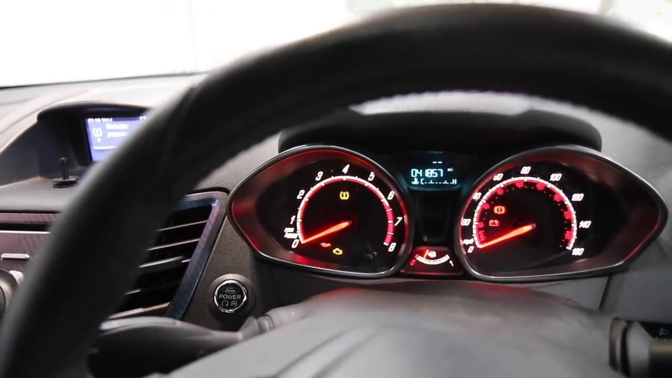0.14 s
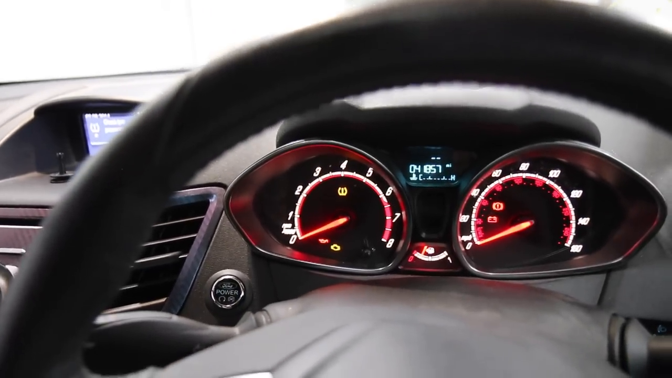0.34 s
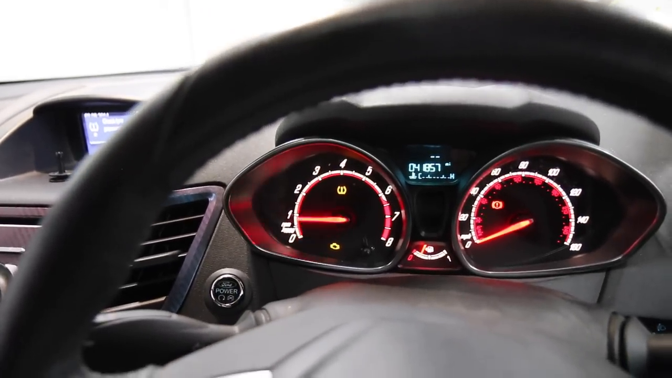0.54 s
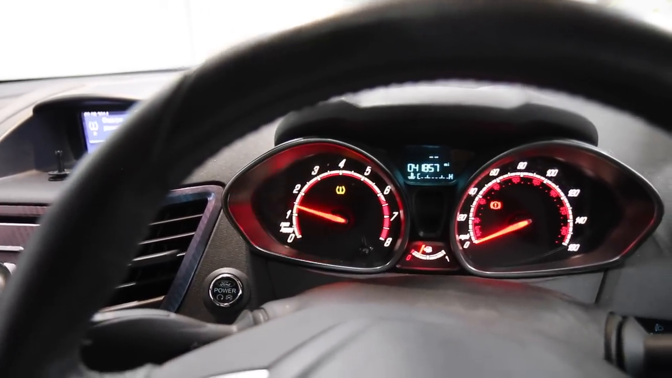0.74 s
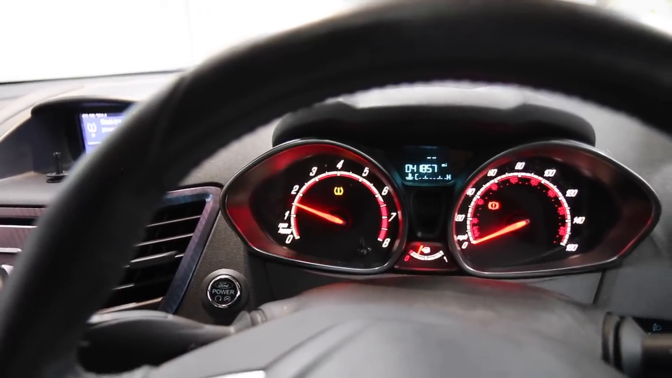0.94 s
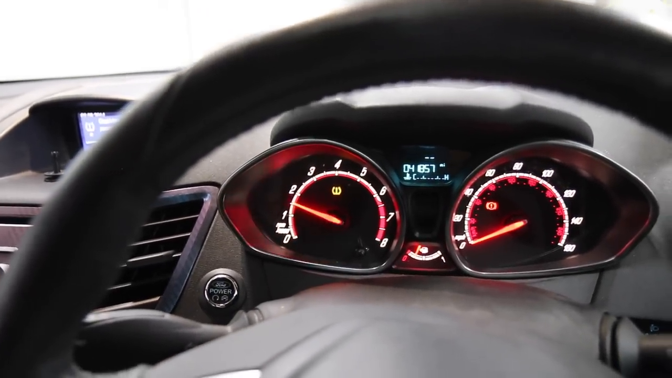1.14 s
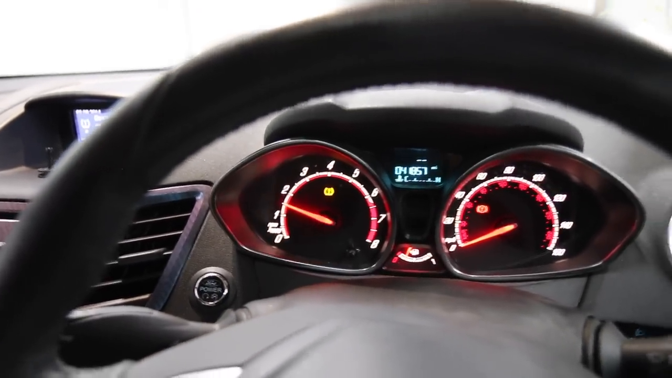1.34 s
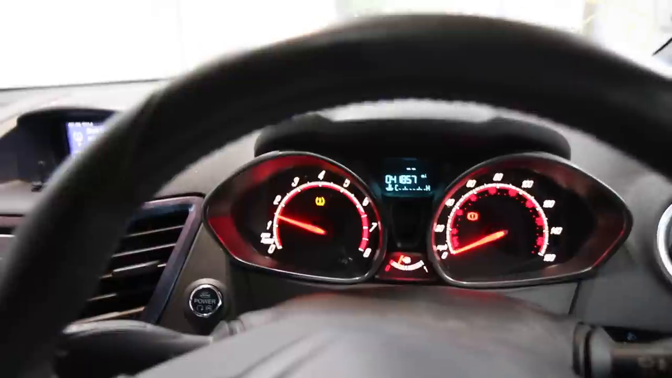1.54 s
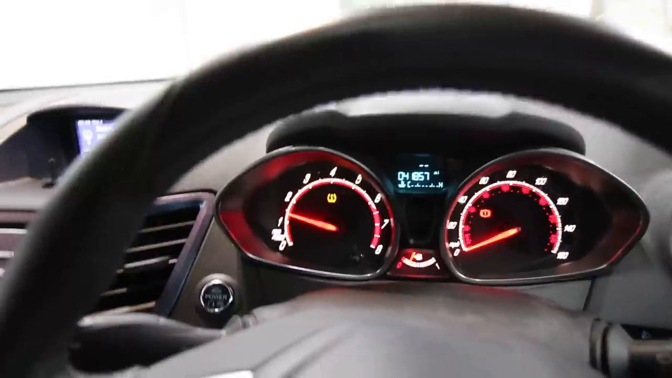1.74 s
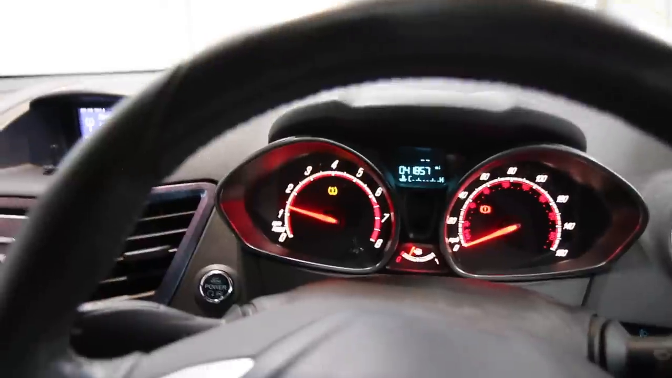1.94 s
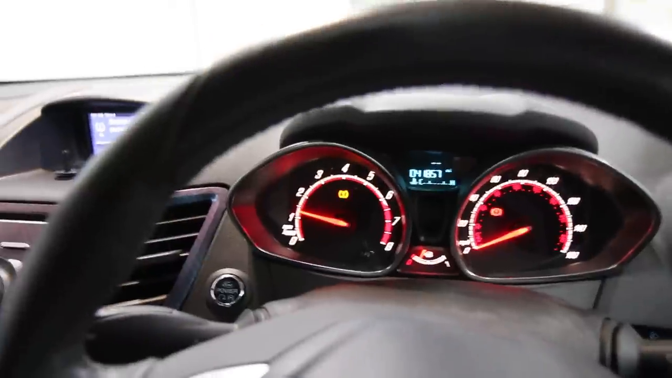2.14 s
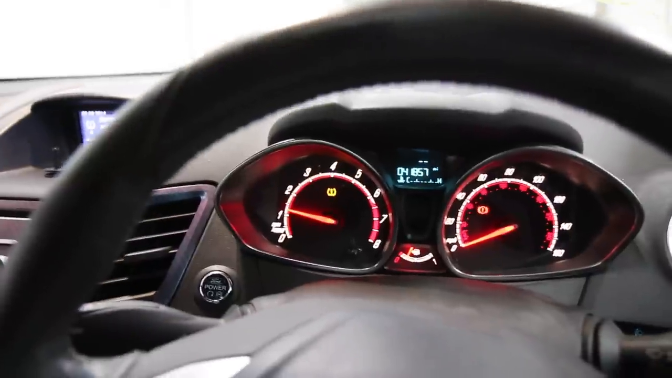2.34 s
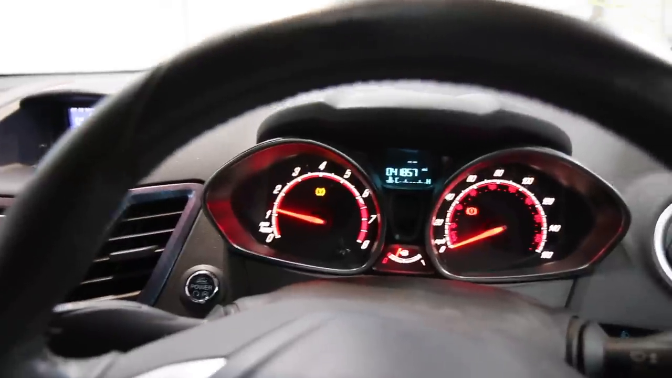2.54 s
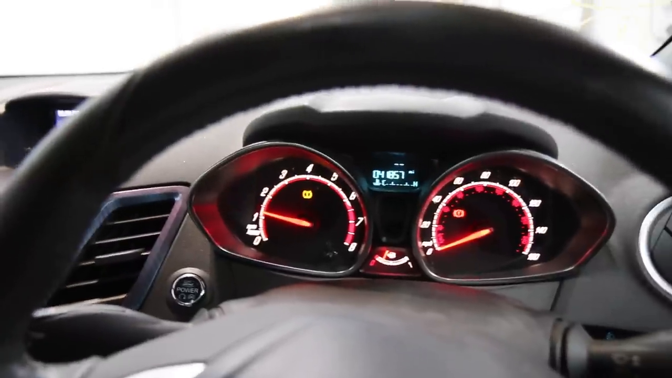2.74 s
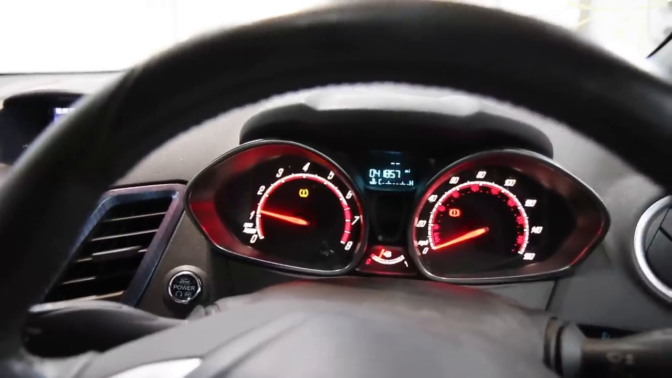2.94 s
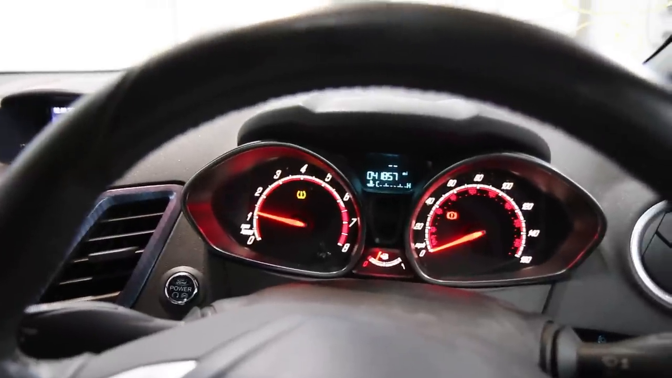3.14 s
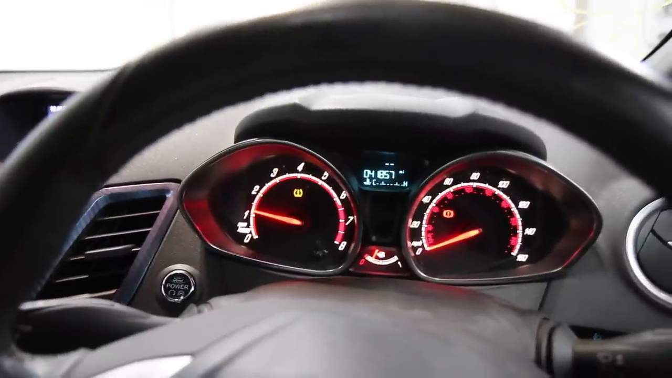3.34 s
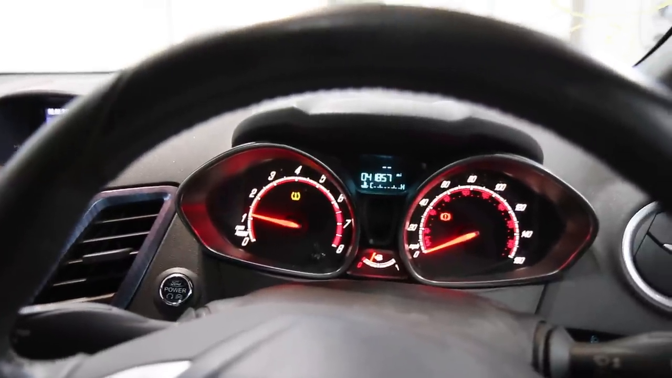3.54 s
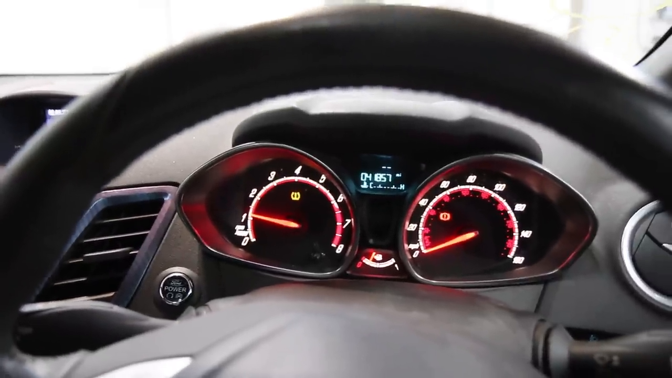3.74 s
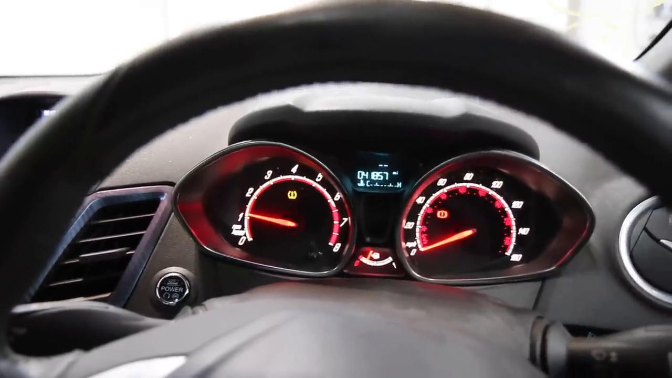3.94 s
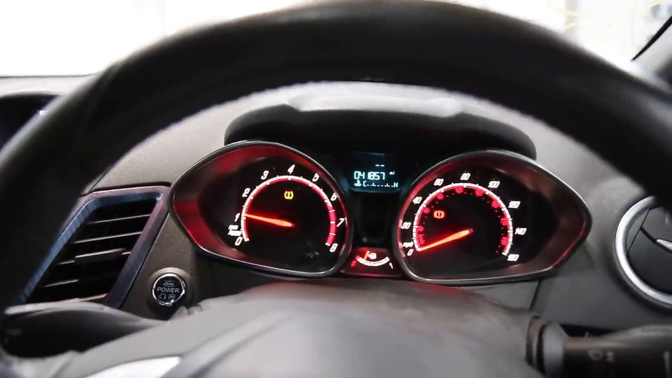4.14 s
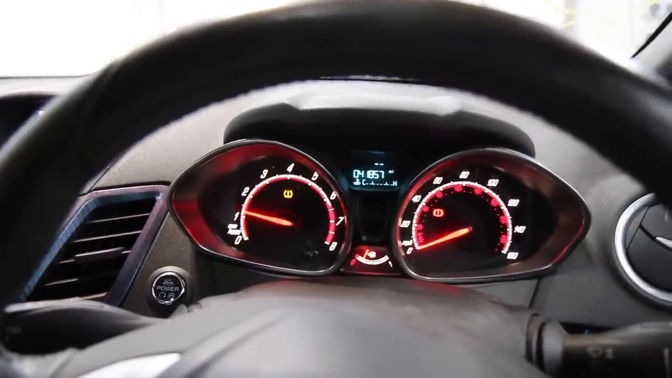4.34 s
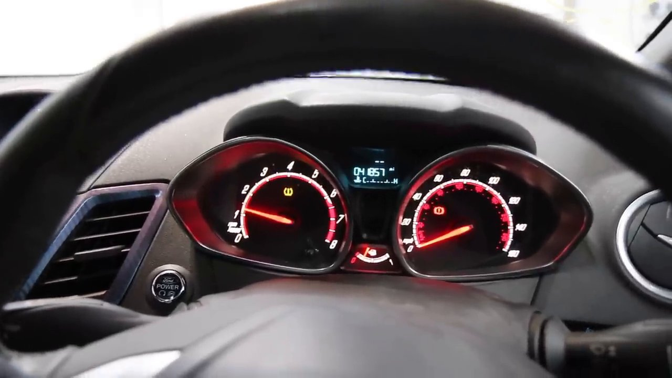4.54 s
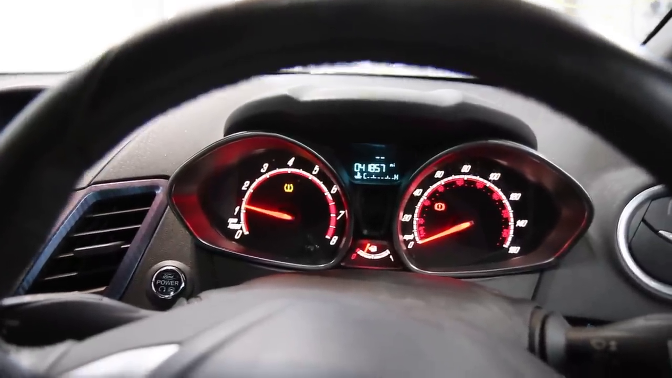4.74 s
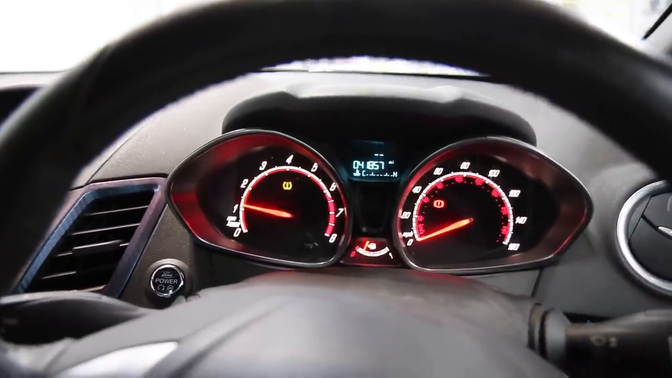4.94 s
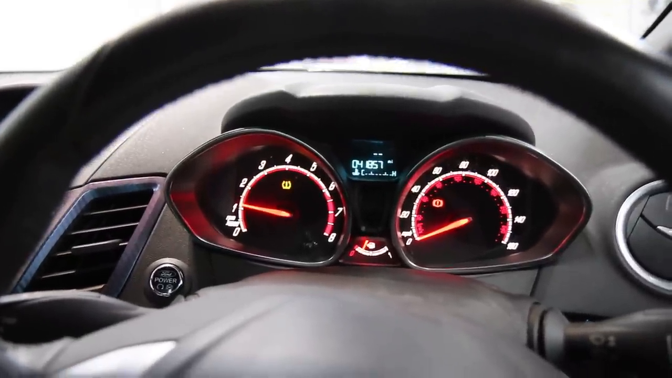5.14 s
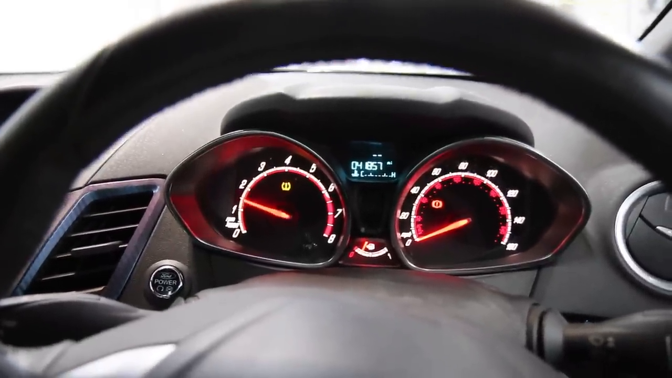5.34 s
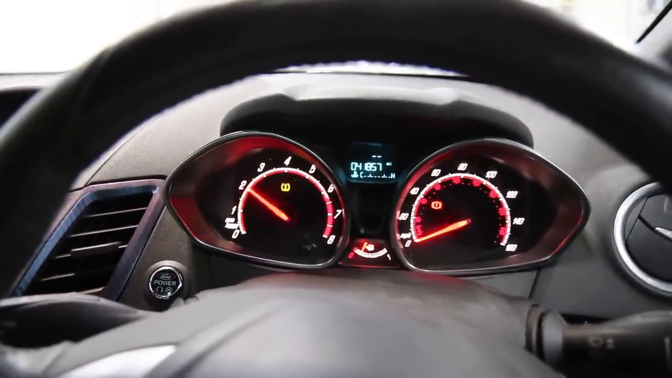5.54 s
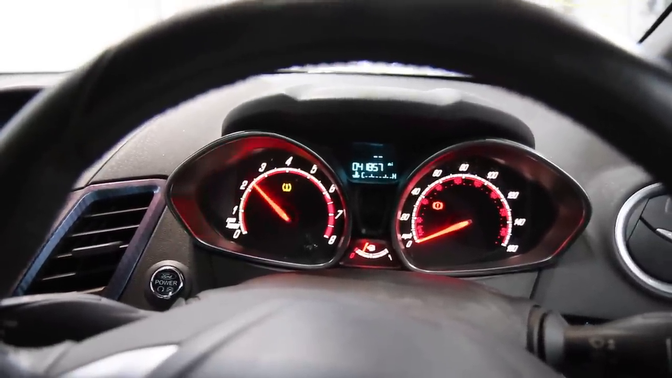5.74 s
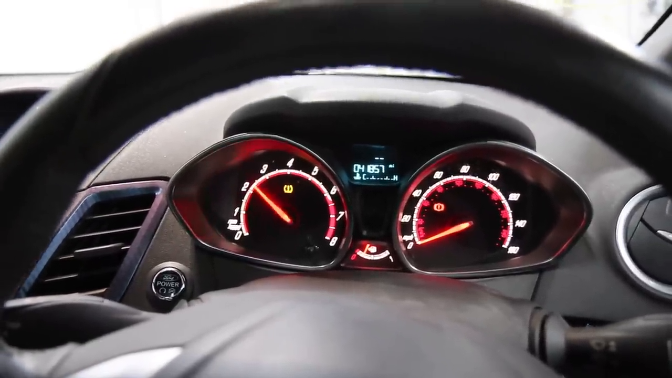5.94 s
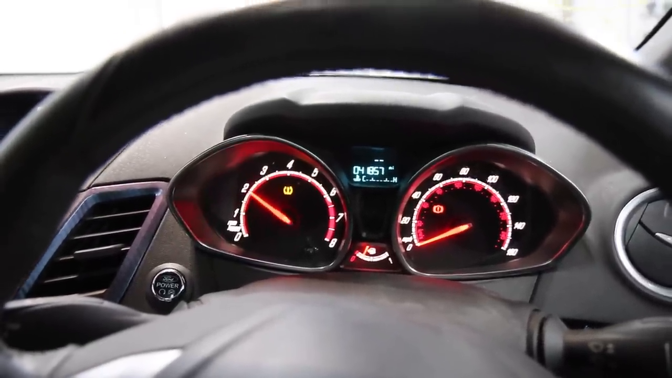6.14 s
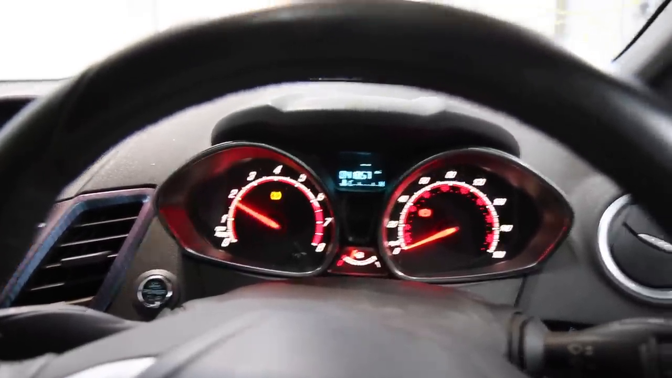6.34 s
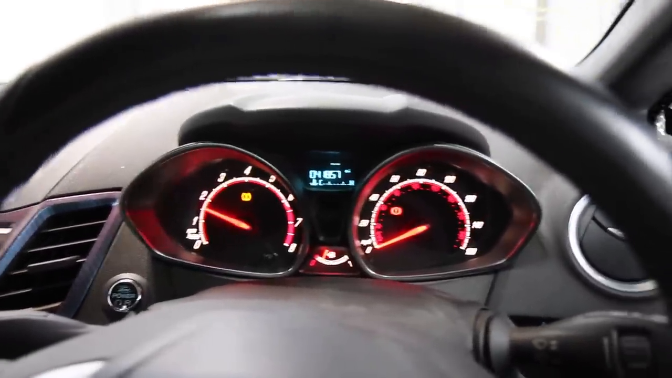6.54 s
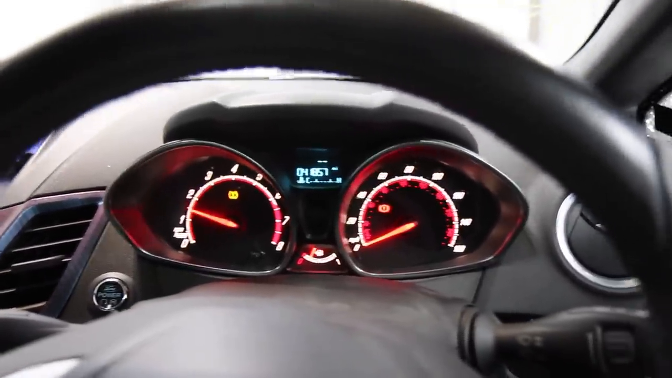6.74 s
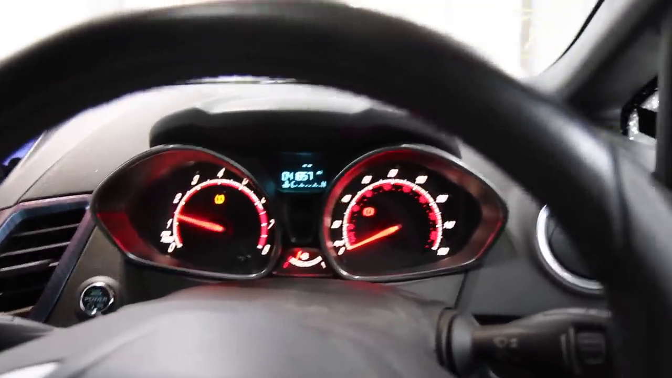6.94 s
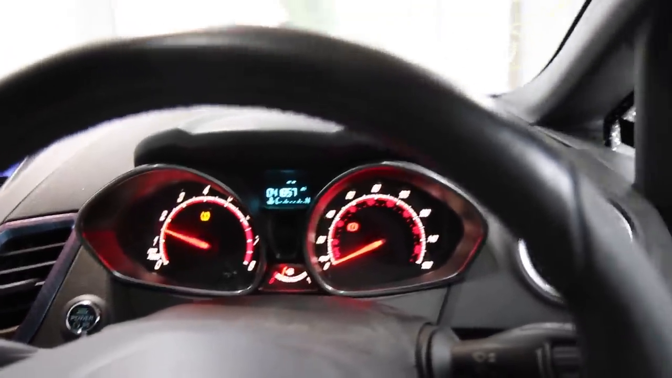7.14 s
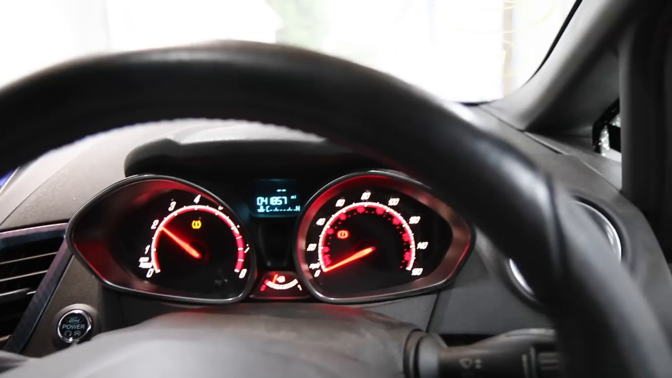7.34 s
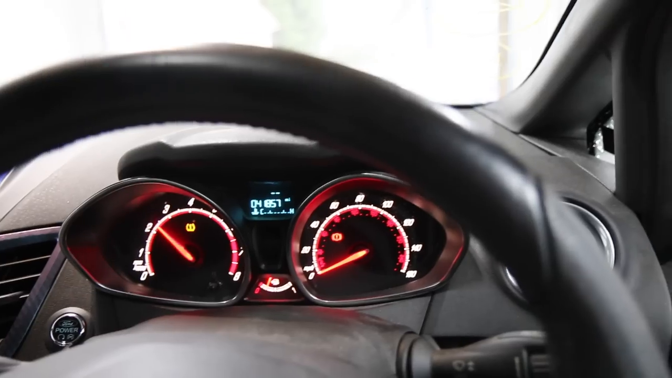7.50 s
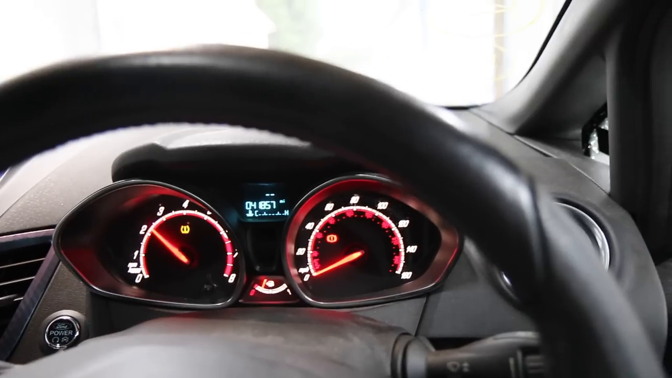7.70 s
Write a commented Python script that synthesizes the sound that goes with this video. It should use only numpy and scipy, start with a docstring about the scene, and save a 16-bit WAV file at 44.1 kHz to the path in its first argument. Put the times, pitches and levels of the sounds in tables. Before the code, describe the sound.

Heard from the driver's seat of a closed car, the engine starts almost at once with a short whirr, a chirp and a few low thumps. The revs rise and sink to a deep, droning idle, with small plastic knocks and faint rustling close by. The throttle is then tapped lightly once and harder twice, the engine growling up and falling back, before a last rev begins.

```python
"""A starter whirrs and a belt chirps as a four-cylinder car engine catches with a shudder, heard from the
driver's seat. It flares, settles to idle, then gets one light and two strong blips of the throttle; a
fourth begins at the end. Periodic firing forces the cabin's air modes into a boom, higher harmonics
drone through the body, and puffs of noise add roughness. The closed cabin lets little treble in.
Close by, plastic trim knocks, ticks and creaks, and a hand rustles over a faint hiss."""
import sys
import numpy as np
from scipy import signal
from scipy.fft import rfft, irfft, next_fast_len
from scipy.io import wavfile
from scipy.ndimage import uniform_filter1d, minimum_filter1d, map_coordinates

SR = 44100
rng = np.random.default_rng(int(sys.argv[2]) if len(sys.argv) > 2 else 0)


def pcm_store(signal):
    """Save signal as 16-bit PCM."""
    levels = np.round(np.clip(np.atleast_2d(signal), -1, 1) * 32767)
    wavfile.write(sys.argv[1], SR, levels.astype(np.int16).T)


N = 342591
TIME = np.arange(N) / SR

# engine speed with the pedal up (cranking, flare, idle): time_s, firing_hz
IDLE_SPEED = [(0, 20), (.2, 22), (.55, 46.4), (.76, 53.7), (1.35, 47.9), (1.95, 42.3), (2.3, 40.8),
              (3, 39.7), (3.8, 37.75), (4.15, 38), (4.6, 40.7), (4.85, 38.3), (5.13, 37.1), (6.6, 47.4),
              (7, 42.9)]
# throttle blips: start_s, rise_s, hold_s, top_firing_hz
BLIPS = [(4.16, .21, .07, 44.7), (5.14, .45, .06, 82.2), (6.99, .36, .07, 81.3), (7.67, .12, .05, 78)]
# how hard the cylinders fire relative to idle, negative while coasting: time_s, load_db
LOAD = [(0, 6), (.1, -3.5), (.24, 16), (.5, 16), (.7, 0.5), (1, -1.5), (1.4, 0), (1.7, -1.5), (2.4, 0.5),
        (3.7, -2.5), (4.15, 0.5), (4.36, 6.5), (4.6, 1), (4.95, -1), (5.22, 9), (5.45, 5), (5.65, 5),
        (5.92, 0), (6.25, -4), (6.55, -9), (6.8, -3), (7.05, 7), (7.35, 2.5), (7.58, -1), (7.77, 2.5)]
# low orders, with quarters from unequal cylinders: firing_multiple, level_db, db_per_load_db
LOW_ORDERS = [(0.748, -14, -1.4), (1.002, 3.5, 0.57), (1.25, -26, -0.5), (1.499, -29, 0.3),
              (2.001, -5, 1.12), (2.502, -24, -0.5), (2.999, -11.5, 1.19)]
# high orders, with halves from unequal cylinders: firing_multiple, level_db
HIGH_ORDERS = [(3.5, 3.5), (4.0, 14), (4.5, -4.5), (5.0, 10.5), (5.5, 1.5), (6.0, 6.5), (6.5, -4),
               (7.0, 6.5), (7.5, 0), (8.0, 3), (8.5, 4), (9.0, 0.5), (9.5, 0.5), (10.0, 1.5), (10.5, -7.5),
               (11.0, -3.5), (11.5, -5.5), (12.0, -11), (12.5, -17.5), (13.0, -5.5)]
# transmission from engine to seat: frequency_hz, gain_db
BODY_RESPONSE = [(130.0, 0), (165.0, -15.5), (195.0, -3), (220.0, -4), (248.0, 6), (285.0, -17),
                 (325.0, -1.54), (360.0, -5.5), (385.0, 1.5), (415.0, -4.5), (447.0, 11.5), (468.0, -2.5),
                 (495.0, -1.5), (560.0, -20), (680.0, -7), (800.0, -12.5), (1000.0, -50.5)]
# cabin resonances, and the belt's for the chirp: centre_hz, width_hz, gain_db
AIR_MODES = [(40.9, 6, -26.5), (59.8, 3.26, -5), (67.4, 4.6, -7.5), (72.8, 3.6, -14.5), (96.8, 4.7, -23.5),
             (131.8, 5.63, -9), (190, 21, -13.5), (197, 12, -18.5), (241, 25, -11.5)]
GROWL_MODES = [(132.3, 24, 4.5), (193, 16, 3.5), (233, 22, -5.5)]
RASP_MODES = [(334, 31, -2.5), (392.4, 9.1, -3.5), (455.3, 22, -3.5), (465, 30, -11)]
CHIRP_MODES = [(2110, 90, -6), (2188, 55, 0), (2240, 70, -4), (2370, 140, -11)]
# growth of the engine layers: idle_db, db_per_load_db, db_per_speed_octave
DRONE_LAW, GROWL_LAW = (-44.5, 1.0, 1), (-41.5, 1.05, 17)
RASP_LAW, RUSH_LAW = (-40, 0.74, 10.5), (-52, 0.26, 6.54)
# the starter engages, then cranks: start_s, length_s, level_db
STARTER_RUNS = [(0, 0.048, -42.5), (0.123, 0.292, -44)]
# jolts of the first firings: start_s, pitch_hz, level_db, t60_s
JOLTS = [(0.165, 195, -9, 0.052), (.225, 60, -10, .15), (0.251, 188, -13.5, .1), (.271, 48, 0, 0.25),
         (0.306, 108, -5.5, 0.16), (0.365, 60, -3, 0.38), (.398, 61, 5.5, .17), (0.398, 120, -10.5, .1),
         (0.474, 66, 4, 0.26), (0.513, 128, -0.5, 0.12)]
# knocks on the trim, levels relative: start_s, click_db, clack_db, thud_db, clack_t60_s
KNOCKS = [(0.355, -39.5, -34.5, -34, 0.12), (2.1, -39.5, -32.5, -7, 0.089), (2.264, -28, -25, -16, 0.024),
          (2.274, -29, -28, -12, 0.06), (2.63, -50.5, -33.5, -26, 0.054), (2.974, -68, -43.5, -43, 0.16),
          (3.009, -39.5, -39.5, -29, 0.061), (3.05, -52, -39, -23.5, 0.064),
          (3.076, -53.5, -36.5, -35.5, .05), (3.121, -72, -46.5, -29, 0.12)]
# ticks of the trim: start_s, relative_level_db
TICKS = [(0.5122, -34.5), (.6439, -40), (1.7524, -30), (2.005, -42), (2.8439, -37), (2.871, -40),
         (2.8924, -39.5), (3.72, -40)]
# swells of the belt, a panel and a moving hand: centre_s, length_s, level_db
BELT_CHIRPS = [(.26, 0.088, -39.5), (.6, 0.32, -59), (1.8, 0.4, -65), (3.35, 0.37, -61.5),
               (3.95, 0.14, -64), (6.62, 0.47, -63)]
CREAKS = [(2.99, .05, -46), (3.06, .06, -44)]
RUSTLES = [(1.36, 0.28, -59.5), (1.62, 0.14, -62.5), (1.9, 0.29, -62), (2.07, 0.13, -58.5),
           (2.62, .49, -59), (3.03, .13, -59)]
# spectra of the noise sources: frequency_hz, relative_density_db
SHAKE_SPECTRUM = [(22, -6), (45, -7), (65, -9.5), (90, 9.5), (150, -11), (200, -11.5)]
RUSH_SPECTRUM = [(300, -38.5), (520, -15), (670, 1), (880, -4.5), (1150, -11.5), (1650, -22), (2000, -22),
                 (3000, -27.5), (5000, -27), (9000, -54.5)]
WHIRR_SPECTRUM = [(500, -1.5), (800, 17), (1150, 12), (1550, 11), (1850, 0.5), (3000, -0.5), (4000, -3),
                  (6000, -4.5), (7000, -8.5), (10000, -17), (15800, -26)]
CLICK_SPECTRUM = [(900, -30), (2500, 1), (3500, 0), (6000, -1), (9000, -9), (12500, -14), (15800, -24)]
CLACK_SPECTRUM = [(300, -7), (600, -12.5), (850, -1), (925, 1.5), (1050, -5), (1400, -8.5), (1700, -6.5),
                  (2000, -17), (3500, -25.5)]
THUD_SPECTRUM = [(60, -24.5), (130, -1.5), (180, 9), (240, -6.5), (295, -1), (370, -14), (480, -15),
                 (700, -21.5)]
TICK_SPECTRUM = [(1500, -15), (3300, -5), (5000, 2), (8000, -11), (11000, -22), (15800, -30.5)]
RUSTLE_SPECTRUM = [(1000, -8), (3000, 0.5), (5000, -0.5), (8000, -3.5), (11000, -15.5), (15800, -21.5)]
HISS_SPECTRUM = [(500, 5.5), (900, 13), (1150, 16.5), (1600, 13.5), (1950, 8.5), (2300, 8), (3000, 5.5),
                 (5000, 3), (7000, 2), (10000, 0), (15800, -1)]


def engine_speed(coast_per_s=.575):
    """Firing rate in Hz: each blip raises it, then friction decays it exponentially to governed idle."""
    idle = speed = curve(IDLE_SPEED)
    for start, rise, hold, top in BLIPS:
        before = np.interp(start, TIME, speed)
        climb = before + (top - before) * ease((TIME - start) / rise)
        coasting_s = np.maximum(TIME - start - rise - hold, 0)
        coast = np.maximum(idle, top * np.exp(-coast_per_s * coasting_s))
        speed = np.select([TIME < start, TIME < start + rise], [speed, climb], coast)
    return speed * (1 + .003 * wobble(9))


def engine_gain(law, speed, idle_hz=40):
    """Power law: a layer's amplitude grows with load and with speed above idle."""
    idle_db, per_load, per_octave = law
    octaves = np.log2(np.maximum(speed / idle_hz, 1))
    return amp(idle_db + per_load * curve(LOAD) + per_octave * octaves)


def engine_boom(firings, shake_db=-10.5, uneven_db=0.14):
    """Forced resonance: low orders drive the cabin's air modes, which ring on and beat against them."""
    load_db = curve(LOAD)
    push = -sum(amp(db + per_load * load_db) * tone(multiple * firings)
                for multiple, db, per_load in LOW_ORDERS)
    caught = np.clip((TIME - .6) / 0.068, 0, 1)
    drive = caught * push * amp(uneven_db * wobble(35))
    drive += amp(shake_db + 0.68 * load_db) * noise(SHAKE_SPECTRUM)  # uneven firing shakes the cabin
    return filtered(drive, lambda hz: sum(amp(db) * bandpass(hz, centre, width)
                                          for centre, width, db in AIR_MODES))


def engine_drone(speed, firings, flutter_db=3.57, sway_cycles=0.0091):
    """Source and filter: the high orders swell as they glide through the body's resonances."""
    caught = np.clip((TIME - .52) / 0.23, 0, 1)
    drone = np.zeros(N)
    for multiple, db in HIGH_ORDERS:
        level_db = db + along(BODY_RESPONSE, multiple * speed) + flutter_db * wobble(7)
        cycles = multiple * firings + 0.59 * rng.random() + sway_cycles * wobble(18)
        drone += amp(level_db) * tone(cycles)
    return caught * engine_gain(DRONE_LAW, speed) * drone


def engine_roughness(speed, firings, pulsing=0.28, imbalance=0.28, lines_db=-7.8):
    """Amplitude modulation: each firing puffs noise into the cabin's modes, one in four more strongly."""
    puffs = unit(np.exp(pulsing * np.cos(2 * np.pi * firings) + imbalance * np.cos(np.pi * firings / 2)))
    growl = engine_gain(GROWL_LAW, speed) * resonate(puffs * rng.standard_normal(N), GROWL_MODES)
    rasp = engine_gain(RASP_LAW, speed) * resonate(puffs * rng.standard_normal(N), RASP_MODES)
    rush = unit(np.sqrt(puffs) * noise(RUSH_SPECTRUM))
    # the rush keeps faint lines of the high orders, each coming and going
    lines = np.zeros(N)
    for multiple in np.arange(14, 48) / 2:
        level_db = along(RUSH_SPECTRUM, multiple * speed) + 4 * wobble(3)
        lines += amp(level_db) * tone(multiple * firings + rng.random())
    return growl + rasp + engine_gain(RUSH_LAW, speed) * (rush + amp(lines_db) * unit(lines))


def intake(speed, level_db=-50, brisk_hz_per_s=67):
    """Flow noise: air is drawn in while the open throttle pulls the speed up."""
    climb = np.clip(np.gradient(speed) * SR / brisk_hz_per_s, 0, 1)
    climb *= TIME > BLIPS[0][0]
    return amp(level_db) * lag(climb ** 2, 0.011) * noise(WHIRR_SPECTRUM)


def starter(release_s=0.064):
    """Gear noise: a fluttering whirr and grind that decays exponentially after each run."""
    gate = sum(amp(db) * ((TIME >= start) & (TIME < start + length)) for start, length, db in STARTER_RUNS)
    running = lag(gate, 0.0013)
    gears = amp(1.7 * wobble(150)) * (noise(WHIRR_SPECTRUM) + noise(RUSH_SPECTRUM))
    return np.maximum(running, lag(running, release_s)) * gears


def belt():
    """Narrow-band resonance: the belt chirps as the engine catches, then rings softly at times."""
    return swells(BELT_CHIRPS) * resonate(rng.standard_normal(N), CHIRP_MODES)


def jolts():
    """Damped free vibration: each of the first firings sets the body ringing."""
    return sum(amp(db) * burst(start, t60, attack_s=0.0052) * np.sin(2 * np.pi * hz * (TIME - start))
               for start, hz, db, t60 in JOLTS)


def trim_knocks():
    """Impact excitation: struck plastic gives a gritty click, a hollow clack and a longer, low thud."""
    click = unit(noise(CLICK_SPECTRUM) * amp(2.5 * wobble(500)))
    clack, thud = noise(CLACK_SPECTRUM), noise(THUD_SPECTRUM)
    knocks = np.zeros(N)
    for start, click_db, clack_db, thud_db, t60 in KNOCKS:
        contact = amp(click_db + 2) * click + amp(clack_db + 5) * clack
        knocks += burst(start, t60, attack_s=.005) * contact
        knocks += burst(start, 1.37 * t60, attack_s=0.0012) * amp(thud_db) * thud
    return knocks


def trim_ticks():
    """Damped transients: small plastic parts give brief bursts of bright noise."""
    envelope = sum(amp(db - 12.5) * burst(start, t60_s=0.073, attack_s=0.001) for start, db in TICKS)
    return envelope * noise(TICK_SPECTRUM)


def panel_creak(pitch_hz=954, width_hz=28):
    """Friction excitation: rubbing plastic rings one narrow resonance."""
    return swells(CREAKS) * resonate(rng.standard_normal(N), [(pitch_hz, width_hz, 0)])


def cabin_background(hiss_db=-56.5):
    """Broadband noise: a steady hiss, and grainy swells where a moving hand rustles."""
    hiss = amp(hiss_db) * noise(HISS_SPECTRUM)
    rustle = unit(noise(RUSTLE_SPECTRUM) * amp(2 * wobble(200)))
    return hiss + swells(RUSTLES) * rustle


def amp(db):
    """Decibels to amplitude ratio."""
    return 10 ** (np.asarray(db) / 20)


def unit(x):
    """Normalisation to rms 1."""
    return x / np.sqrt(np.mean(x ** 2) + 1e-20)


def tone(cycles):
    """A sinusoid of rms 1."""
    return np.sqrt(2) * np.cos(2 * np.pi * cycles)


def along(points, hz):
    """Interpolation of (frequency_hz, value) points on a logarithmic axis."""
    frequencies, values = np.transpose(points)
    return np.interp(np.log(hz + 1), np.log(frequencies + 1), values)


def curve(points):
    """Linear interpolation of (time_s, value) points at every sample."""
    return np.interp(TIME, *np.transpose(points))


def ease(progress):
    """Raised-cosine ramp from 0 to 1."""
    return np.sin(np.pi / 2 * np.clip(progress, 0, 1)) ** 2


def wobble(knots_per_s):
    """Smooth random modulation: a spline through Gaussian knots."""
    coarse = TIME[::64]
    knots = rng.standard_normal(int(TIME[-1] * knots_per_s) + 4)
    return np.interp(TIME, coarse, map_coordinates(knots, [coarse * knots_per_s]))


def burst(start_s, t60_s, attack_s):
    """Envelope of a blow: a quick rise, then exponential decay."""
    age = np.clip(TIME - start_s, 0, 2)
    return (1 - np.exp(-age / attack_s)) * amp(-60 * age / t60_s)


def swells(rows):
    """Superposition of Gaussian envelopes."""
    return sum(amp(db) * np.exp(-(2 * (TIME - centre) / length) ** 2) for centre, length, db in rows)


def lag(x, time_constant_s):
    """First-order relaxation towards x."""
    keep = np.exp(-1 / (time_constant_s * SR))
    return signal.lfilter([1 - keep], [1, -keep], x)


def filtered(x, response):
    """Linear filtering: the spectrum of x times a frequency response."""
    size = next_fast_len(N + SR // 2)
    return irfft(rfft(x, size) * response(np.fft.rfftfreq(size, 1 / SR)), size)[:N]


def noise(spectrum):
    """Coloured noise of rms 1, falling steeply beyond the ends of its spectrum."""
    low, high = spectrum[0][0], spectrum[-1][0]
    skirts = lambda hz: 1 / np.sqrt((1 + (low / (hz + 1)) ** 10) * (1 + (hz / (1.2 * high)) ** 20))
    return unit(filtered(rng.standard_normal(N), lambda hz: amp(along(spectrum, hz)) * skirts(hz)))


def bandpass(hz, centre, width):
    """Frequency response of a damped oscillator, 1 at resonance."""
    return 1j * hz * width / (centre ** 2 - hz ** 2 + 1j * hz * width)


def resonate(x, modes):
    """Parallel resonances, each applied twice for steep skirts; rms 1."""
    return unit(filtered(x, lambda hz: sum(amp(db) * bandpass(hz, centre, 2 * width) ** 2
                                           for centre, width, db in modes)))


def scene():
    """Superposition at the seat: speed and load drive the engine; start-up and cabin sounds add to it."""
    speed = engine_speed()
    firings = np.cumsum(speed) / SR  # phase, one cycle per firing
    engine = engine_boom(firings) + engine_drone(speed, firings)
    engine += engine_roughness(speed, firings) + intake(speed)
    start_up = starter() + belt() + jolts()
    trim = trim_knocks() + trim_ticks() + panel_creak()
    return (engine + start_up + trim + cabin_background())[None]


def record(dry, threshold_db=-5.5, fast_s=.025, slow_s=.6, limit=.83, top_hz=15800):
    """Compression: gain falls in loud passages, recovers slowly after long ones; a limiter caps peaks."""
    peak = -minimum_filter1d(-np.abs(dry[0]), size=800)
    over_db = np.maximum(20 * np.log10(peak + 1e-9) - threshold_db, 0)
    levelled = dry[0] * amp(-np.maximum(lag(over_db, fast_s), lag(over_db, slow_s)))
    needed_gain = np.minimum(1, limit / (np.abs(levelled) + 1e-9))
    held_gain = minimum_filter1d(needed_gain, size=1200)
    smooth_gain = uniform_filter1d(uniform_filter1d(held_gain, size=600), size=600)
    fades = ease(np.minimum(TIME, TIME[-1] - TIME) / .006)
    return filtered(levelled * smooth_gain * fades, lambda hz: hz < top_hz)[None]


dry = scene()
out = record(dry)
pcm_store(out)
```